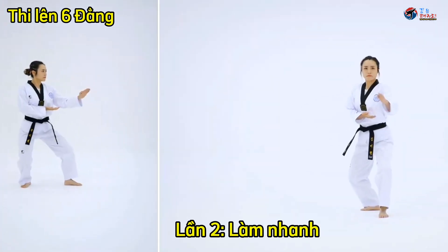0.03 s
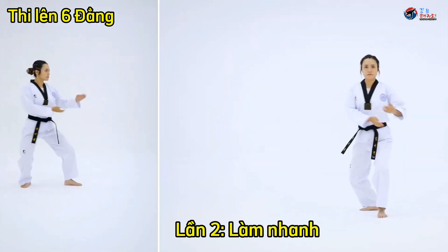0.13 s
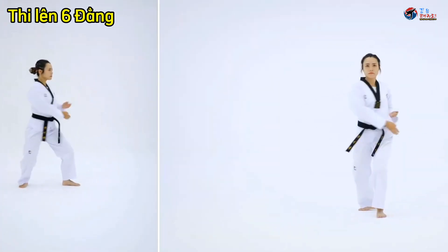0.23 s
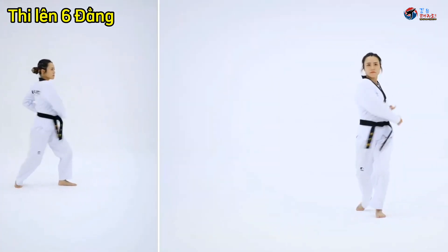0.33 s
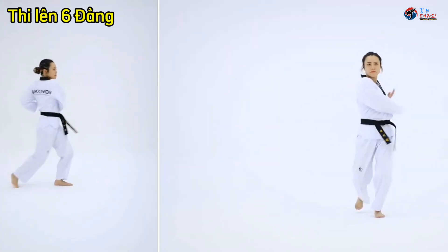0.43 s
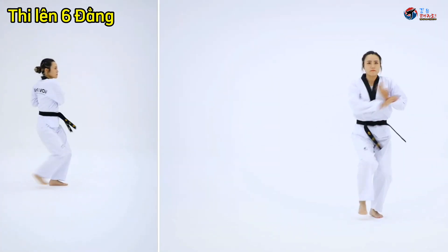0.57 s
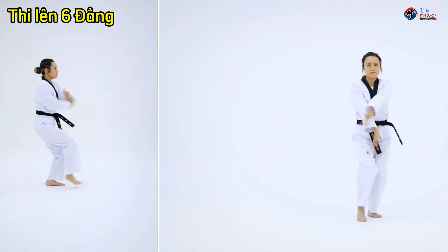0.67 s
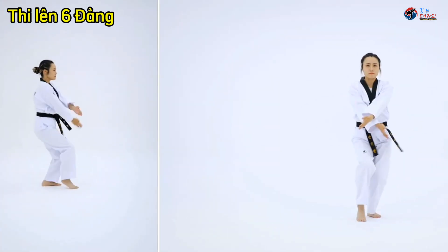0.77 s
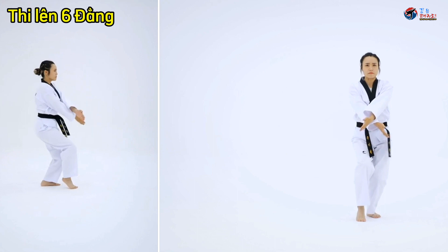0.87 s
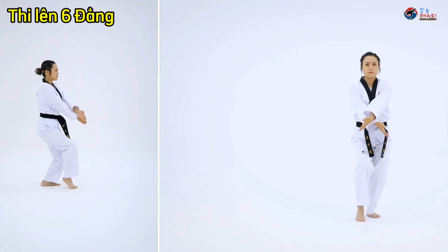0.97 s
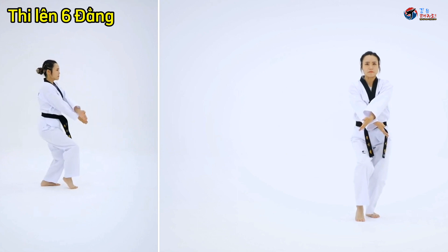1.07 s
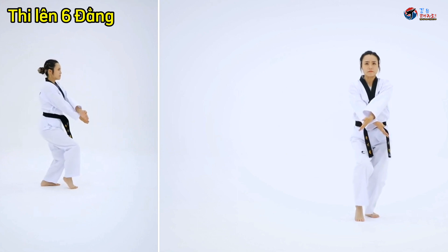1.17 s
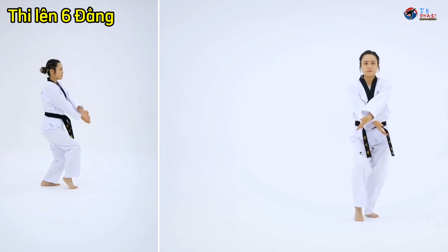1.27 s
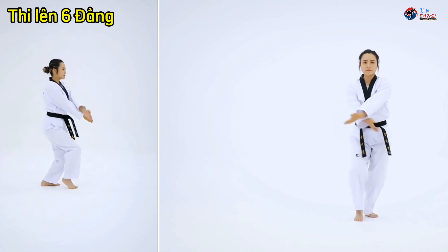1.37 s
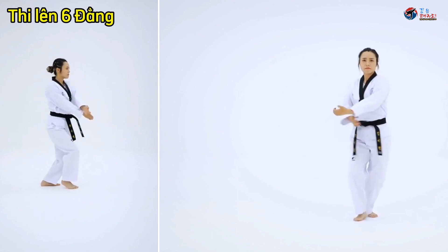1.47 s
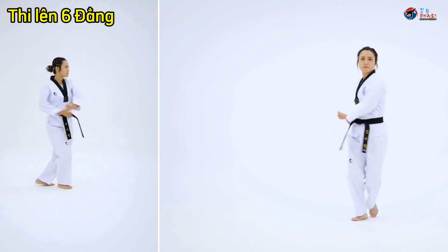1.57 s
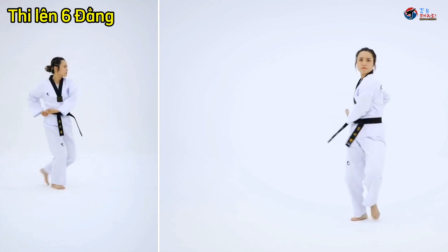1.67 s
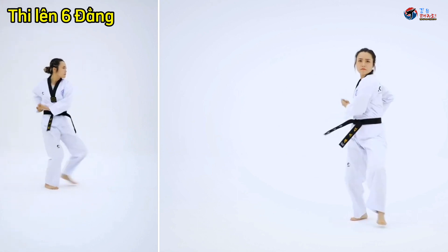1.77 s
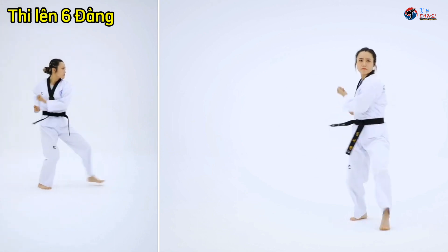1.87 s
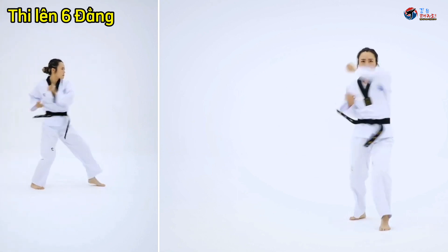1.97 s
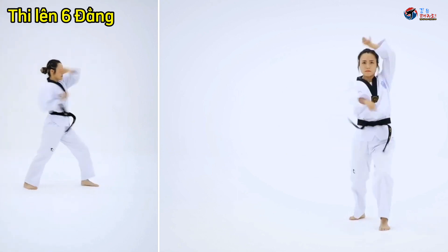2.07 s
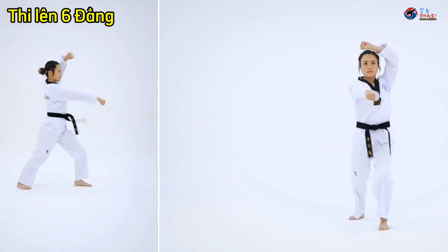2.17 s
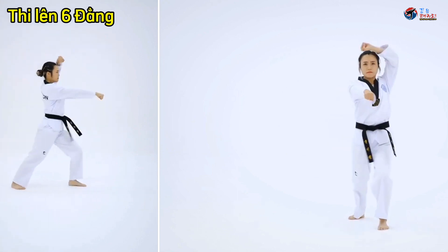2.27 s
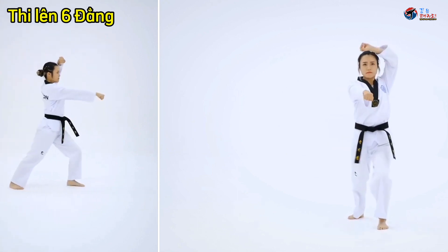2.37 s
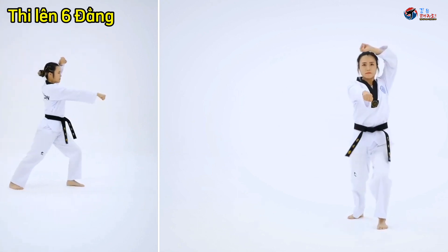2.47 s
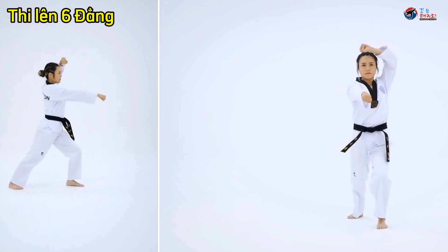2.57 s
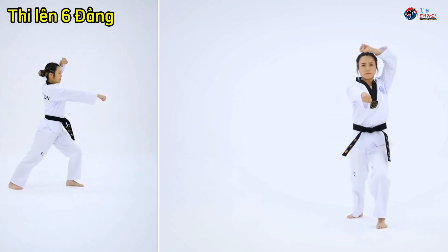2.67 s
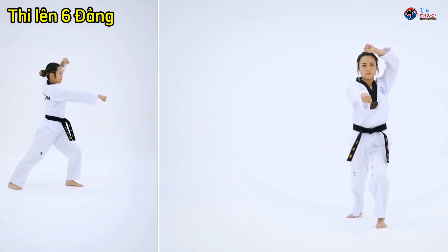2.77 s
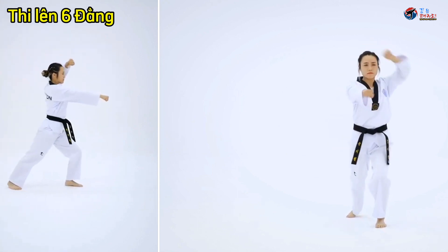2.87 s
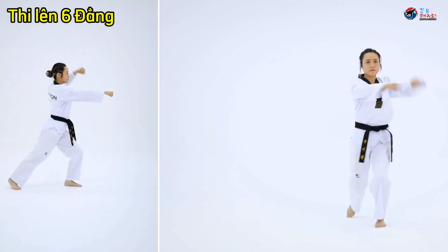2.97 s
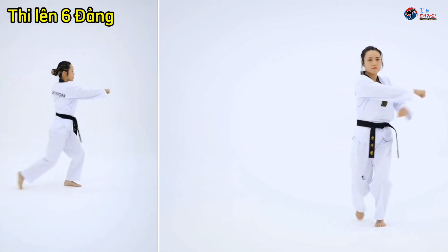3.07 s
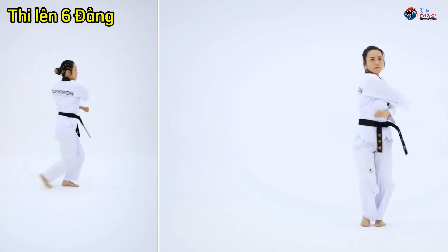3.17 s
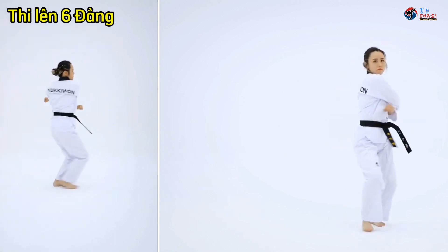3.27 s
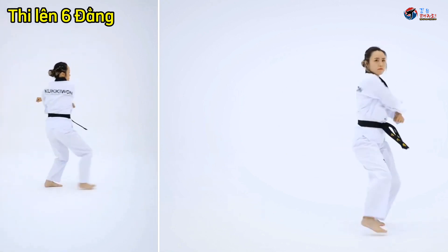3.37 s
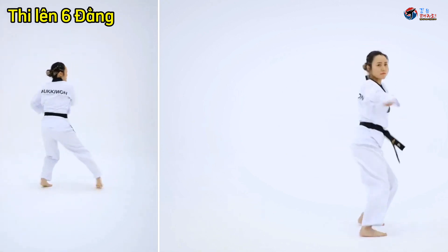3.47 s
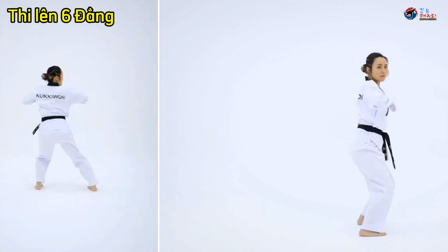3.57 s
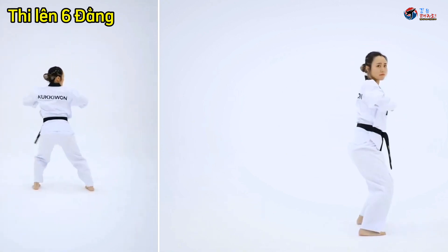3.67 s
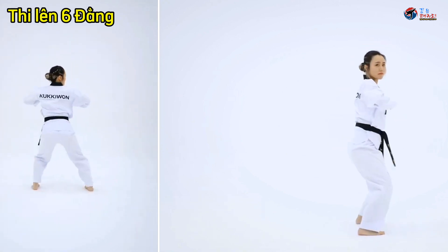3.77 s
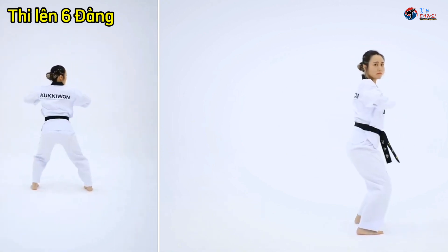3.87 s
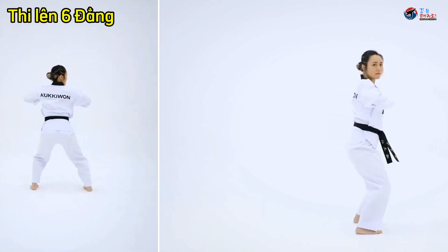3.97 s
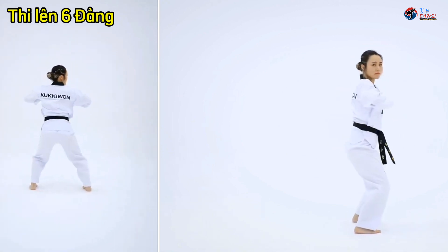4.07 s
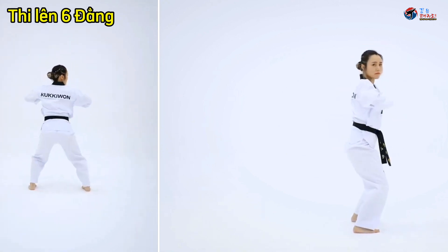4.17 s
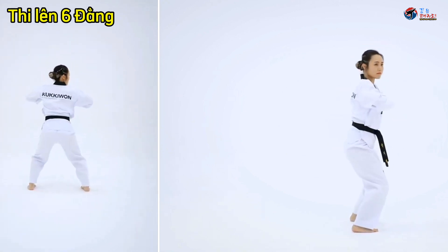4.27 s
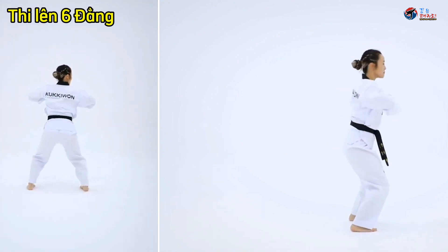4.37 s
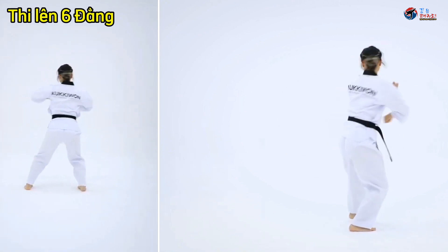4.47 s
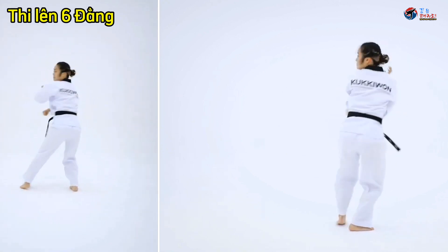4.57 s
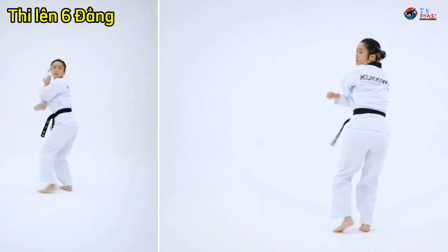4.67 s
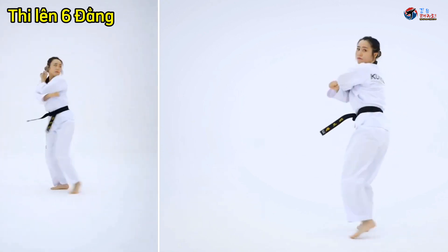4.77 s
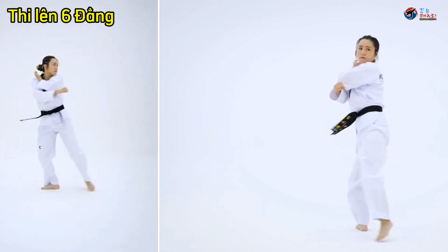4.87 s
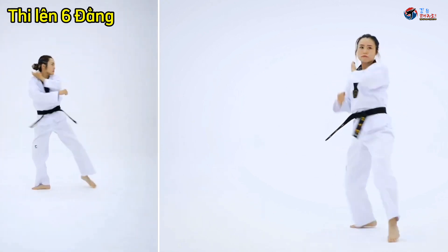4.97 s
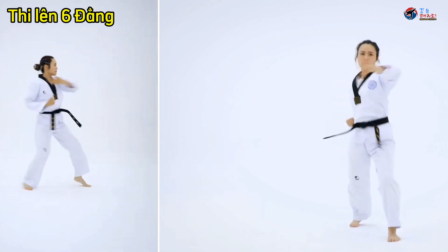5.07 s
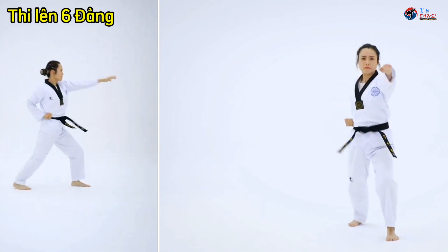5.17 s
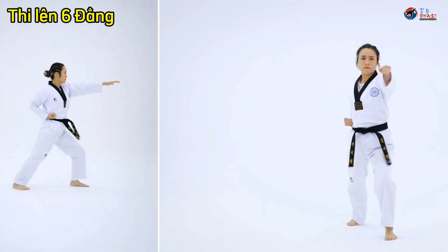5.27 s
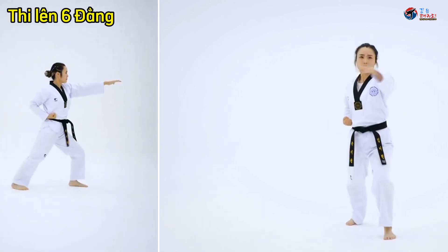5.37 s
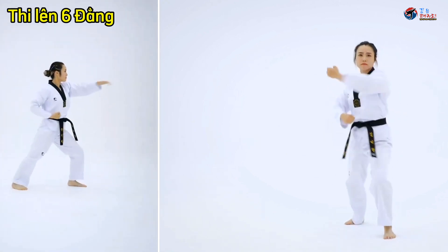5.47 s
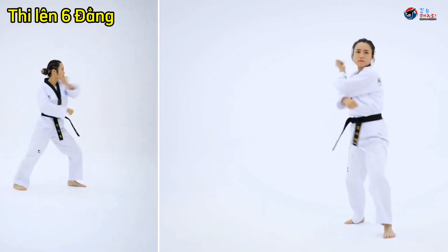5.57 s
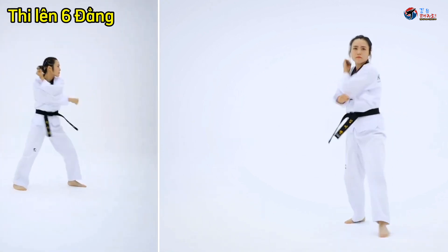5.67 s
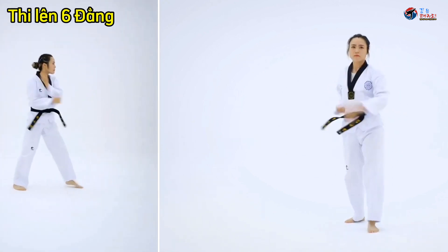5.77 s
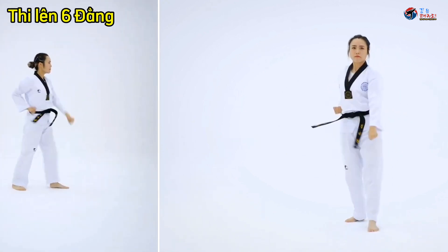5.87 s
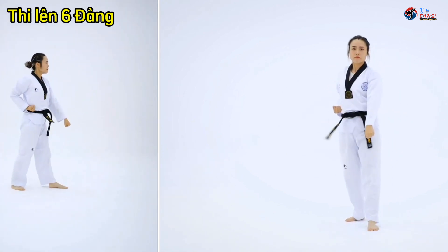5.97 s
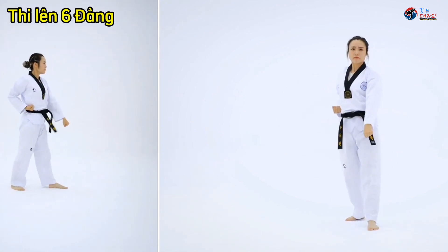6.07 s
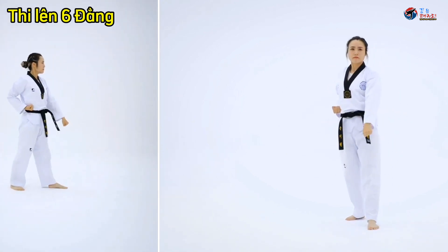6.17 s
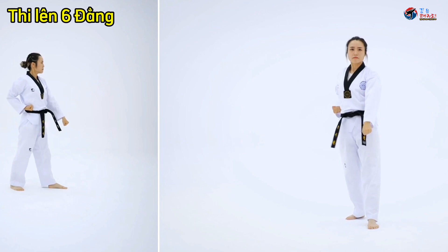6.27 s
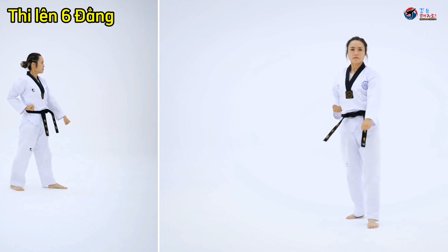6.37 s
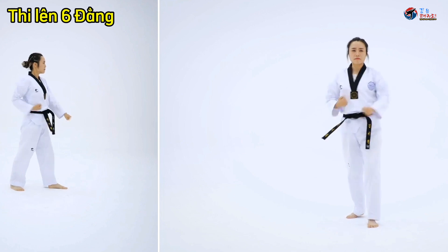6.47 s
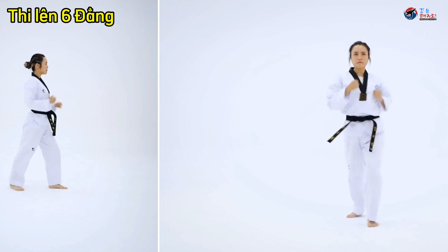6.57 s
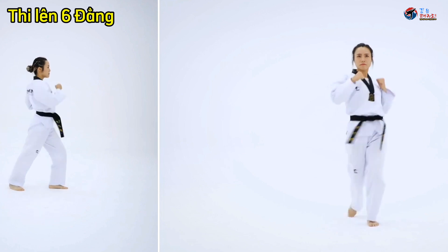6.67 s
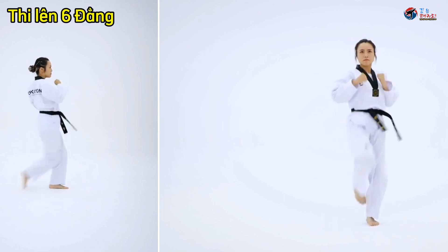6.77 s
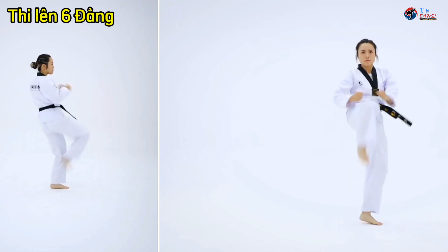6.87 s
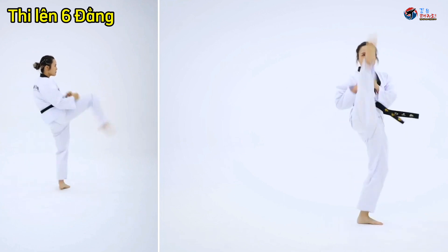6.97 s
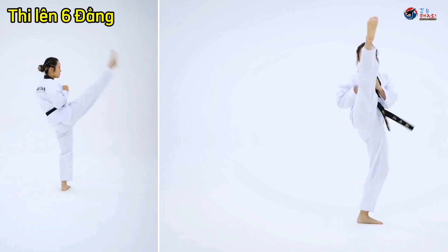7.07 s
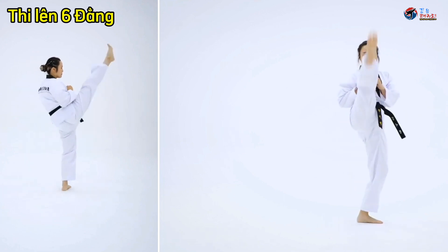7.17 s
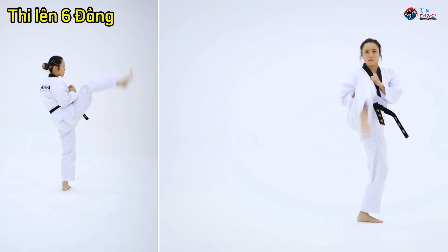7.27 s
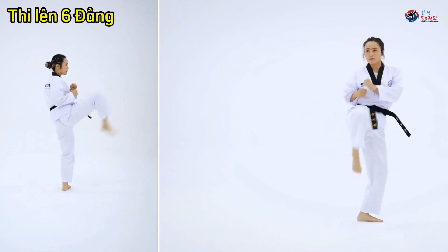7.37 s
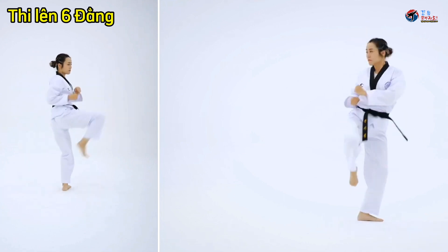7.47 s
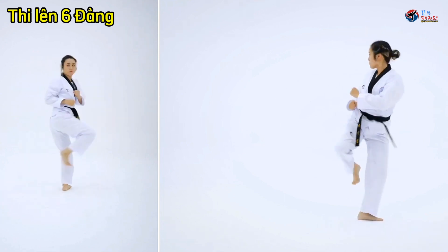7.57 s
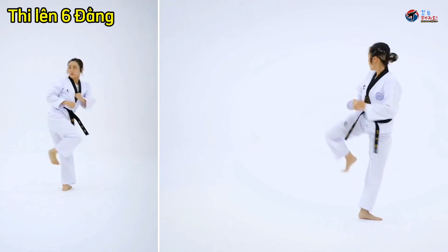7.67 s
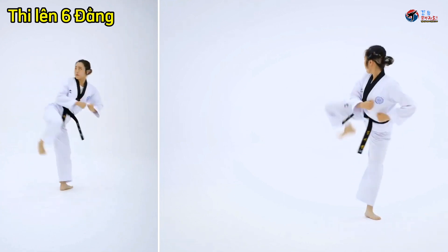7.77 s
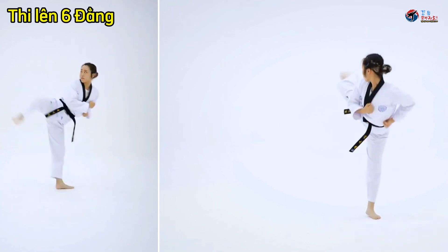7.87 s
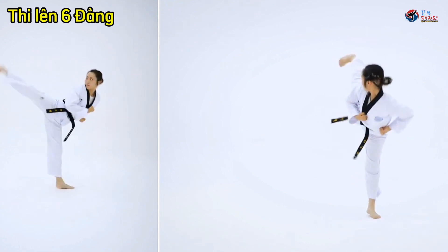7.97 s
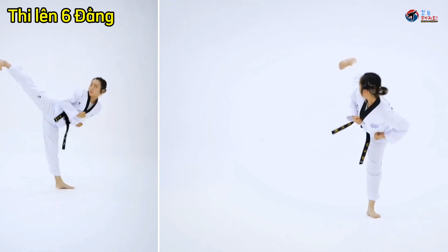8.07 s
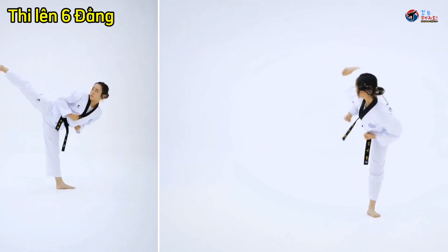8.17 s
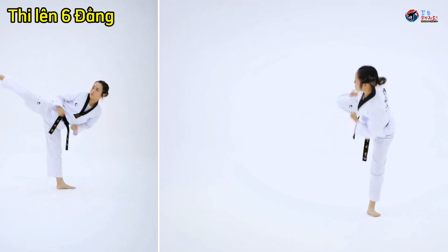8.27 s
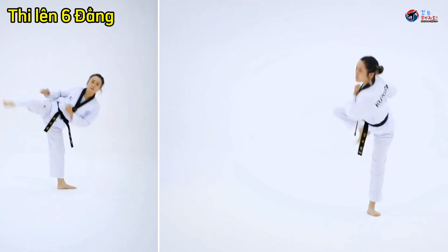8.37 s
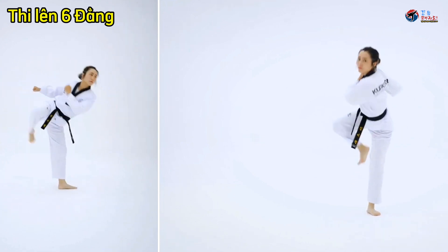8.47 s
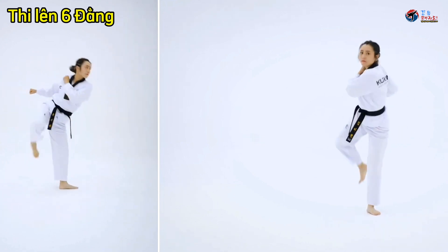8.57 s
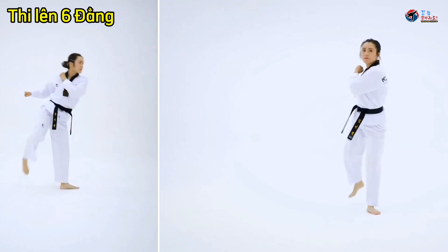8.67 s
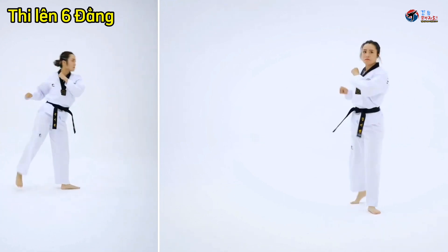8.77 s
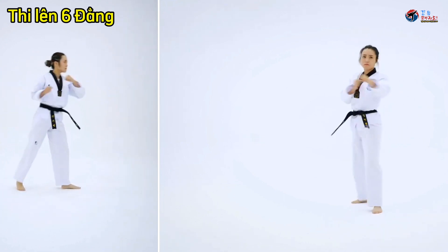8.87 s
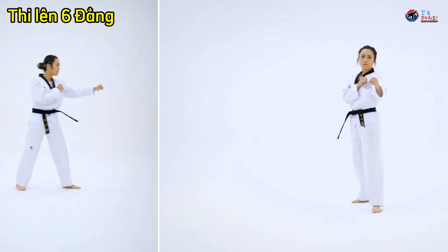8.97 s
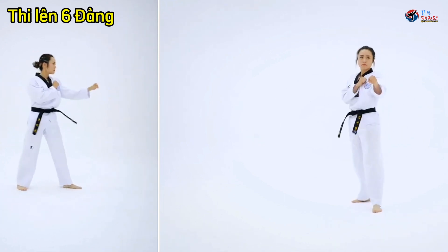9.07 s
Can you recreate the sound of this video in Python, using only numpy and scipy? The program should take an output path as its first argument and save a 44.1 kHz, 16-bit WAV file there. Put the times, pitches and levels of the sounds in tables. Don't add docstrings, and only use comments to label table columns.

```python
import sys
import numpy as np
from scipy import signal
from scipy.fft import rfft, irfft, next_fast_len
from scipy.io import wavfile
from scipy.ndimage import uniform_filter1d

SR = 44100
rng = np.random.default_rng(int(sys.argv[2]) if len(sys.argv) > 2 else 0)


def invert_db(level):
    return 10 ** (np.asarray(level, dtype=float) / 20)


def dump_mix(stems):
    frames = np.atleast_2d(stems).T
    limited = np.clip(frames, -1, 1)
    pcm = np.round(limited * 32767).astype(np.int16)
    wavfile.write(sys.argv[1], SR, pcm)


N = 402633


def unit(x):
    return x / np.sqrt(np.mean(x ** 2))


def colour(x, table):
    size = next_fast_len(len(x))
    hz, db = np.transpose(table)
    f = np.arange(size // 2 + 1) * SR / size + 1
    gain = invert_db(np.interp(np.log(f), np.log(hz), db))
    return irfft(rfft(x, size) * gain, size)[:len(x)]


def ring(x, hz, q):
    b, a = signal.iirpeak(min(hz, SR / 3), q, fs=SR)
    return signal.lfilter(b, a, x)


def walk(rate):
    size = int(SR / rate)
    held = np.repeat(rng.standard_normal(N // size + 1), size)
    return uniform_filter1d(held, size)[:N]


def add(track, s, sound):
    i = int(s * SR)
    track[i:i + len(sound)] += sound[:len(track) - i]


# (start [s], stop [s], low rustle [dB], bright rustle [dB])
REST_PIECES = [
    (0.419, 0.561, -52.5, -62),
    (0.563, 1.463, -51.5, -69),
    (1.461, 2.476, -50.5, -57.5),
    (2.884, 3.5, -54, -58.5),
    (4.696, 6.419, -52.5, -57),
    (6.642, 7.442, -53, -59),
    (7.522, 8.392, -50.5, -58.5),
]
# (start [s], stop [s], air [dB], cloth [dB], hiss [dB])
FLUTTERS = [(0.563, .62, -28, -33.5, -46.5), (0.637, 0.686, -27, -30.5, -49),
            (2.018, 2.133, -22.5, -30.5, -44.5), (3.212, 3.218, -26, -36.5, -48),
            (3.25, 3.309, -24.5, -28.5, -42.5), (4.68, 4.695, -45, -45, -55),
            (5.329, 5.442, -24.5, -28, -42.5), (6.113, 6.203, -24, -30.5, -45.5),
            (7.012, 7.063, -31, -41, -52.5), (7.078, 7.119, -20.5, -31, -47),
            (7.855, 7.952, -20, -29.5, -45)]
# (time [s], air [dB], cloth [dB], hiss [dB])
CLOTH_JERKS = [(0.554, -35, -32.5, -37), (.608, -35, -26, -50), (0.632, -13, -26, -40),
               (2.009, -33, -42, -36.5), (2.032, -34, -32, -51), (2.058, -14.5, -27, -45),
               (3.191, -32.5, -36.5, -37.5), (3.25, -22, -26, -41), (3.265, -19, -25.5, -48),
               (5.334, -37, -37, -34), (5.38, -20, -25, -45), (5.403, -13, -20.5, -36),
               (6.114, -36, -49, -35), (6.145, -11.5, -21, -39), (7.045, -22.5, -41, -61),
               (7.52, -54, -39.5, -61.5), (7.866, -32, -19, -38), (7.905, -7, -19.5, -35),
               (7.931, -10.5, -27, -36)]
# (early onset [s], rise [dB/s], gain over the flutter [dB], settling [dB/s])
FLUTTER_SLOPES = [
    (-0.0038, 558, 0.5, 177.5),
    (-0.0062, 402, 2.5, 88.5),
    (0.0049, 247, 6, 85),
    (0.032, 449, 1.5, 103),
]
# (rise [dB/s], fall [dB/s])
JERK_RATES = [
    (900, 700),
    (2000, 600),
    (2500, 400),
    (1200, 700),
]


def motion():
    t = np.arange(N) / SR
    power, gate = np.zeros((4, N)), np.zeros(N)
    for t0, t1, low_db, bright_db in REST_PIECES:
        on = (t >= t0) & (t < t1)
        gate[on] = 1
        power[:, on] = invert_db([[low_db], [low_db - 1], [bright_db + 2], [bright_db]]) ** 2
    early, rise, swell, settle = np.transpose(FLUTTER_SLOPES)[:, :, None]
    shapes = [(t0 - early, t1, dbs, rise, swell, settle) for t0, t1, *dbs in FLUTTERS]
    jump, drop = np.transpose(JERK_RATES)[:, :, None]
    shapes += [(s, s, dbs, jump, 0, drop) for s, *dbs in CLOTH_JERKS]
    for t0, t1, (air_db, cloth_db, hiss_db), up, over, down in shapes:
        near = slice(int((np.min(t0) - .2) * SR), int((t1 + .8) * SR))
        u = t[near]
        weave_db = cloth_db + .4 * (hiss_db - cloth_db) - 9
        db = np.array([[air_db], [cloth_db], [weave_db], [hiss_db]])
        db = db + over * (np.clip((u - t0) / (t1 - t0 + 1e-6), 0, 1) - .5)
        db = db - up * np.maximum(t0 - u, 0) - down * np.maximum(u - t1, 0)
        power[:, near] += invert_db(db) ** 2
    return np.sqrt(power), gate


def grains(table, scatter_db, q, effort):
    out = 0
    for hz, rate, db in table:
        when, size, noise = rng.random(N), rng.exponential(size=N), rng.standard_normal(N)
        heights = np.sign(noise) * invert_db(scatter_db * np.minimum(size, 3.0))
        pushes = unit((when < rate / SR) * heights)
        pushes = np.sqrt(effort) * pushes + np.sqrt(1 - effort) * noise
        out = out + invert_db(db) * unit(ring(ring(pushes, hz, q), hz, q))
    return unit(out)


# (frequency [Hz], pulse rate [1/s], level [dB])
AIR_PUFFS = [(44, 63, 5), (89.3, 68, 5.5), (171.5, 150, 3.5)]
# (frequency [Hz], pulse rate [1/s], level [dB])
CLOTH_FOLDS = [(360, 300, 2.5), (555, 450, 0), (1000, 700, -4)]
# (frequency [Hz], pulse rate [1/s], level [dB])
YARN_WEAVE = [(1685, 1200, 3), (3030, 2800, -1.5), (4170, 3200, -21.5), (5600, 1500, -25.5)]
# (frequency [Hz], level [dB])
CAPSULE_PEAK = [(8300, -23.5), (9200, -7), (9700, -2), (11000, -0.5), (11600, 1), (12500, -4),
                (14000, -6.5), (15800, -8)]


def moving_cloth(gain):
    hiss = unit(colour(rng.standard_normal(N), [(20, -85)] + CAPSULE_PEAK)) * invert_db(0.89 * walk(70))
    effort = np.clip((gain[0] / invert_db(-36)) ** 2, 0, .7)
    puffs = grains(AIR_PUFFS, 2.1, 0.8, effort)
    folds = grains(CLOTH_FOLDS, 2.7, 1.04, effort)
    crackle = invert_db(4.5 * effort * (walk(220) - .5))
    weave = grains(YARN_WEAVE, 3.3, 1.14, effort) * crackle
    return np.sum(gain * [puffs, folds, weave, hiss], axis=0)


# (time [s], peak level [dB], width [ms])
LOOSE_FLAPS = [(0.6325, -2, 1.3), (0.6452, -6, 0.87), (0.678, -16, 1.5), (2.0325, -6, 0.66),
               (2.0491, -7.5, 0.77), (2.0589, 0.5, 1.08), (2.0922, -8, 0.8), (2.1314, -10.5, 2.7),
               (2.1553, -10, 0.7), (3.2425, -8.5, 1.3), (3.2507, -5, 3.5), (3.2663, -3, 0.92),
               (5.37, -15, 1.8), (5.3803, -4.5, 1.9), (5.3936, -0.5, 1.2), (5.4056, -9, 1.25),
               (5.4239, -7, 0.57), (5.4488, -11, 0.82), (5.465, -8, 0.68), (7.0885, -11, 1.4),
               (6.1456, 3, 1.1), (6.1544, -2, 0.9), (7.0972, -11, 1.5), (7.078, -12.5, 1.7),
               (7.1167, -8.5, 0.34), (7.8983, 7, 1.28), (7.91, 4, 1.28), (7.9231, -15, 0.46),
               (7.9744, -15, 2.5), (7.984, -7, 1.65)]


def flaps():
    out = np.zeros(N)
    for (s, db, ms), swing in zip(LOOSE_FLAPS, rng.uniform(-1.4, 1, len(LOOSE_FLAPS))):
        span = max(ms, .2) * SR / 1000
        u = np.arange(-int(3 * span), int(9 * span)) / span
        suction = (1.97 * u ** 2 - 1) * np.exp(-1.2 * u ** 2)
        back = .5 * swing * (u - 3.5) * np.exp(-.3 * (u - 3.5) ** 2)
        add(out, s - 3 * span / SR, invert_db(db - 4.5) * (suction + back))
    return out


# (time [s], peak level [dB], bright part relative [dB], pitch [Hz])
TIGHT_SNAPS = [(0.5397, -42, -3, 5000), (0.5506, -29, 3.5, 5500), (0.5554, -30.5, 0, 1000),
               (0.569, -27, -8, 900), (0.6079, -15, -23, 1000), (0.6313, -19, -9.5, 900),
               (2.0118, -29, -6, 4500), (2.032, -16, -26, 900), (2.09, -19, -18, 950),
               (3.253, -23, -18, 1000), (3.2645, -13, -24, 1000), (3.2872, -13, -24, 1000),
               (3.3218, -22, -22, 1500), (5.3274, -24.5, -4.5, 4470), (5.3792, -22, -20, 900),
               (5.4042, -17.5, -16, 3000), (6.089, -37, -3, 4600), (6.127, -19, -20, 900),
               (6.133, -16.5, -18, 900), (6.1423, -8, -19.5, 1000), (6.1449, -14, -13, 1800),
               (7.011, -30, -11, 900), (7.0828, -18.5, -24, 960), (7.1113, -15, -30, 1100),
               (7.8624, -20, -20, 1200), (7.895, -19, -18, 1300), (7.9069, -13.5, -22, 980),
               (7.919, -14, -19, 900), (7.9315, -14.5, -21, 1270), (7.9357, -23, -18, 1000)]


def snaps():
    crack_ms, ring_cycles = 0.58, 0.87
    dull, bright = np.zeros(N), np.zeros(N)
    t = np.arange(SR // 80) / SR
    fade = np.exp(-1000 * t / crack_ms)
    for s, db, rel_db, hz in TIGHT_SNAPS:
        noise = rng.standard_normal(len(t))
        tone = np.sin(2 * np.pi * hz * t) * np.exp(-hz * t / ring_cycles)
        add(dull, s + 0.0004, invert_db(db) * (tone + 0.66 * ring(noise, hz, .45) * fade))
        add(bright, s + 0.0008, invert_db(db + rel_db) * (0.36 * noise + 1.26 * (t == 0)) * fade)
    dull = colour(dull, [(200, 1.5), (800, 1.5), (3500, -4), (5500, -2.5), (8000, -14), (16000, -37)])
    return invert_db(3.5) * dull + invert_db(21.0) * colour(bright, [(20, -90)] + CAPSULE_PEAK)


# (start [s], stop [s], frequency [Hz], level [dB])
CLOTH_SWELLS = [(.62, 0.797, 420, -35.5), (6.65, 6.958, 906, -51.5), (.62, .75, 4300, -51),
                (2.04, 2.17, 750, -36), (5.4, 5.5, 3600, -48)]


def swells():
    t = np.arange(N) / SR
    out = np.zeros(N)
    for t0, t1, hz, db in CLOTH_SWELLS:
        arch = np.sin(np.pi * np.clip((t - t0) / (t1 - t0), 0, 1))
        out += invert_db(db) * arch * unit(ring(ring(rng.standard_normal(N), hz, 3.1), hz, 3.1))
    return out


# (time [s], frequency [Hz], level [dB])
HEEL_THUMPS = [
    (5.698, 50.3, -27),
    (6.31, 54.7, -30),
    (7.1, 51.3, -35),
    (7.9164, 50, -10),
]


def thumps():
    out = np.zeros(N)
    for s, hz, db in HEEL_THUMPS:
        cycle = np.arange(int(2 * SR / hz)) * hz / SR
        add(out, s, -invert_db(db) * np.sin(2 * np.pi * cycle * .9) * np.sin(np.pi * cycle / 2) ** 2)
    return out


# (start [s], stop [s], frequency [Hz], unsteadiness [dB], level [dB])
ROOM_DRONES = [
    (.43, 2.4, 157, 1.5, -51.5),
    (1.35, 1.93, 199.4, 0, -53),
    (4.7, 7.8, 187.4, 9, -59),
    (6.645, 9.1, 220, 9, -53),
]


def drones():
    t = np.arange(N) / SR
    out = np.zeros(N)
    for t0, t1, hz, shake_db, db in ROOM_DRONES:
        phase = 2 * np.pi * np.cumsum(hz * (1 + 0.0251 * walk(30))) / SR
        out += ((t > t0) & (t < t1)) * invert_db(db + shake_db * np.tanh(walk(22))) * np.sin(phase)
    return out


def close_track():
    gain, gate = motion()
    track = moving_cloth(gain) + flaps() + snaps() + swells() + thumps() + drones()
    track = track * uniform_filter1d(gate, size=60)
    reused_from_s = 6.645
    start, again = int(reused_from_s * SR), int((reused_from_s + 77073 / 44100) * SR)
    return np.concatenate([track[:again], track[start:start + N - again]])


# (time [s], length [s], level [dB], relative treble [dB])
FAR_MOVES = [(.6, 0.25, -46.5, -3), (2.05, 0.31, -42.5, -9.5), (3.26, 0.45, -46.5, 4),
             (3.597, 0.096, -42, 4), (4.6, 0.081, -56.5, 12), (4.70, 0.12, -46, 15), (4.83, 0.036, -64, 22),
             (5.12, 0.061, -46.5, 12), (5.4, 0.45, -52, -3), (5.85, 0.056, -42, 8), (6.14, 0.068, -72, -3),
             (6.85, 0.041, -40, 6), (7.1, 0.096, -40, -9), (7.9, 0.45, -52.5, 3), (8.85, 0.29, -47, 0)]
# (frequency [Hz], level [dB])
FAR_SPECTRUM = [(100, -12), (300, -4.5), (800, -5.5), (1500, -6), (3000, -6), (6000, -17), (10000, -41),
                (16000, -41)]


def far_moves():
    body, treble = np.zeros(N), np.zeros(N)
    for s, length, db, treble_db in FAR_MOVES:
        t = np.arange(int(4 * length * SR)) / SR / length
        burst = np.sqrt(t) * np.exp(-1.5 * t)
        add(body, s, invert_db(db) * burst)
        add(treble, s, invert_db(db + treble_db) * burst)
    rustle = colour(body * rng.standard_normal(N), FAR_SPECTRUM) * invert_db(10)
    return rustle + invert_db(-17.0) * ring(treble * rng.standard_normal(N), 8000, 0.38)


# (time [s], peak level [dB], pitch [Hz])
TOE_TAPS = [
    (2.352, -31, 3300),
    (3.6095, -38, 3000),
    (3.6198, -27, 2200),
    (3.632, -34, 2800),
    (3.6425, -44, 9000),
    (3.648, -34, 4200),
]


def taps():
    out = np.zeros(N)
    t = np.arange(SR // 200) / SR
    for s, db, hz in TOE_TAPS:
        add(out, s, invert_db(db) * np.cos(2 * np.pi * hz * t - .9) * np.exp(-hz * t / 1.6))
    return out


# (time [s], frequency [Hz], level [dB])
PIVOT_SQUEAK = [
    (4.71, 250, -50),
    (4.75, 590, -47),
    (4.8, 640, -44),
    (4.86, 640, -50),
    (4.93, 640, -56),
]


def squeak():
    s, hz, db = np.transpose(PIVOT_SQUEAK)
    t = np.arange(N) / SR
    phase = 2 * np.pi * np.cumsum(np.interp(t, s, hz) * (1 + .06 * walk(120))) / SR
    level = invert_db(np.interp(t, s, db, left=-120, right=-120))
    return level * (.7 + .7 * walk(110)) * np.sin(phase)


# (frequency [Hz], reverberation time [s])
HALL_DECAY = [(500, 1.25), (2000, 1.66), (5000, 0.57), (12000, 0.33)]


def hall_tail():
    t = np.arange(int(1.5 * SR)) / SR
    tail = np.zeros(len(t))
    for hz, t60 in HALL_DECAY:
        tail += unit(ring(rng.standard_normal(len(t)), hz, 0.56)) * invert_db(-60 * t / t60)
    return tail


# (frequency [Hz], density [dB per Hz])
HALL_AIR = [(24, -71), (40, -48), (87, -15), (124, -11.5), (185, -2.5), (320, -10), (354, -6), (412, -12),
            (491, -4), (646, -11), (1120, -8), (5310, -33), (13100, -49), (16000, -40)]


def hall_air():
    return unit(colour(rng.standard_normal(N), HALL_AIR)) * invert_db(-53.5 + 0.14 * walk(3.43))


# (frequency [Hz], side minus mid level [dB])
STEREO_WIDTH = [(60, -19), (110, -23), (200, -24), (380, -12), (700, -8.5), (1290, -4.5), (2380, 0.5),
                (4400, 1), (8120, 2), (15000, 4.5)]


def far_pair():
    moves = far_moves()
    feet, pivot = taps(), squeak()
    pair = []
    for direct in (1, .3):
        echo = signal.fftconvolve(moves + .5 * feet, hall_tail())[:N]
        pair.append(direct * (moves + feet + pivot) + invert_db(-40.5) * echo + hall_air())
    return pair[0], colour(pair[1], STEREO_WIDTH)


def scene():
    mid, side = far_pair()
    mid = mid + close_track()
    return np.array([mid + side, mid - side])


def band_limit(x):
    return signal.sosfilt(signal.butter(12, 16980, fs=SR, output="sos"), x)


def record(dry):
    rumble = signal.butter(2, 28, "high", fs=SR, output="sos")
    cut = signal.ellip(8, .2, 50, 15780, fs=SR, output="sos")
    rounded = np.tanh(signal.sosfilt(rumble, dry)) / np.tanh(1.3)
    return band_limit(signal.sosfilt(cut, rounded))


dry = scene()
out = record(dry)
dump_mix(out)
```